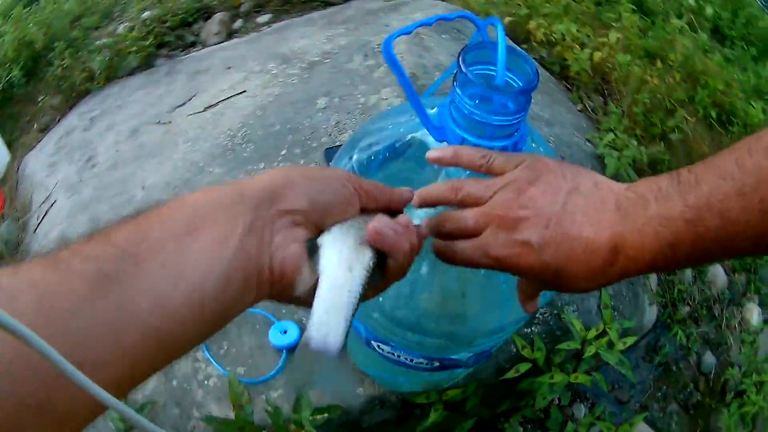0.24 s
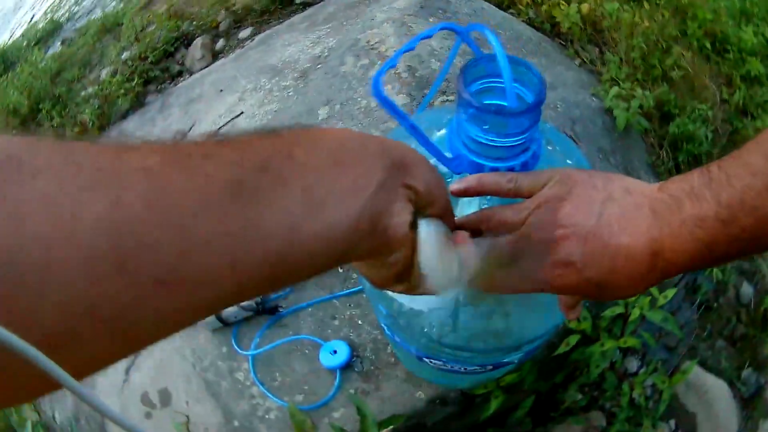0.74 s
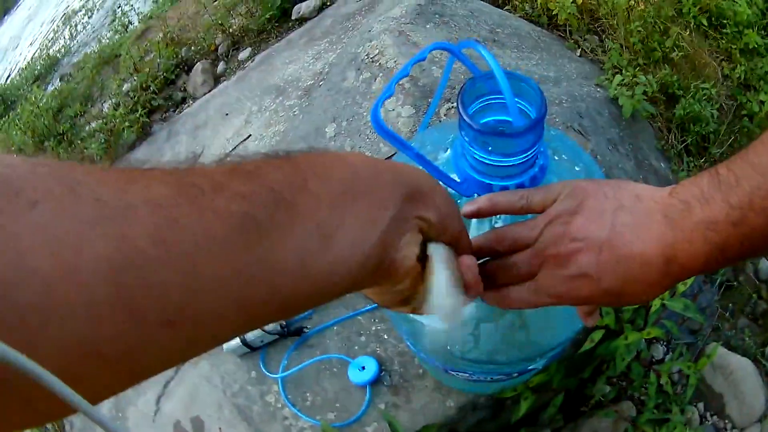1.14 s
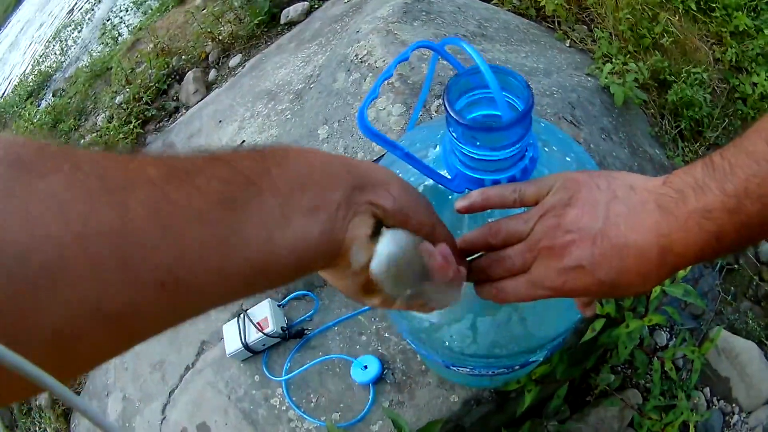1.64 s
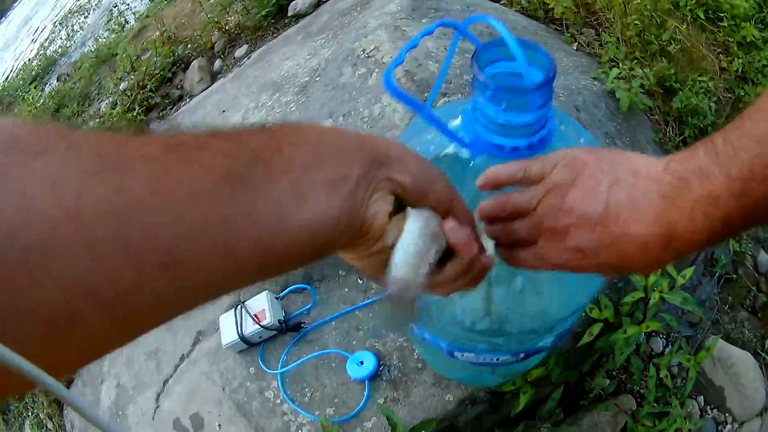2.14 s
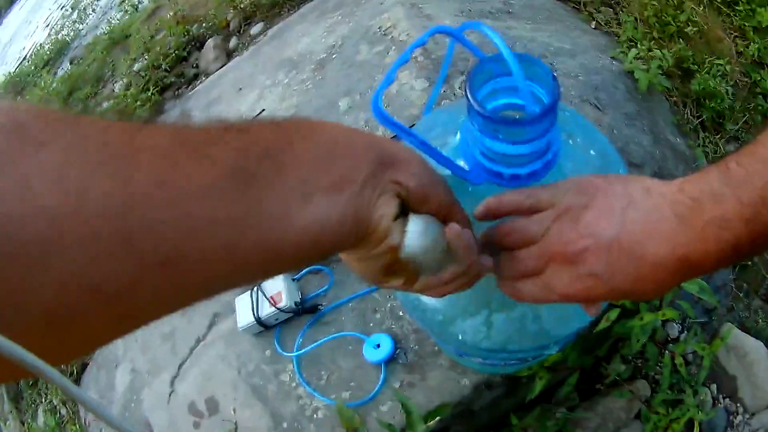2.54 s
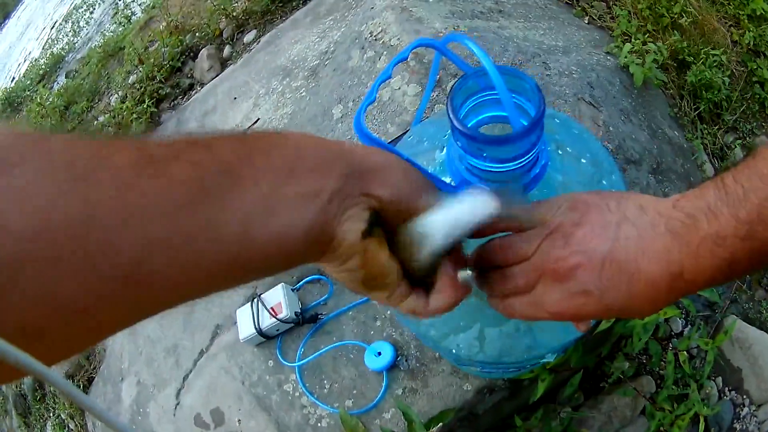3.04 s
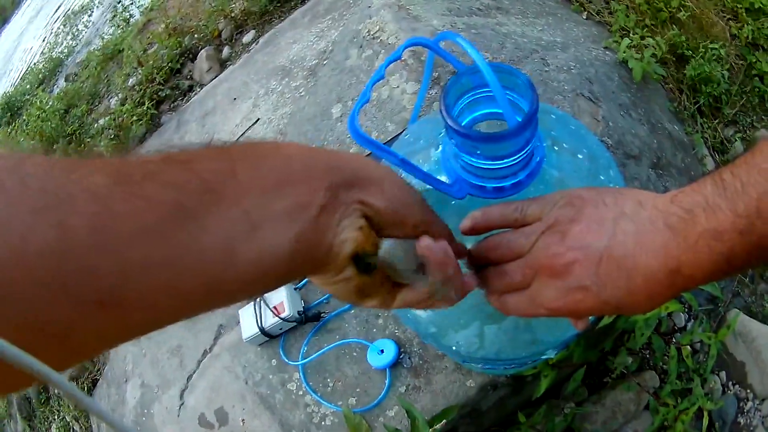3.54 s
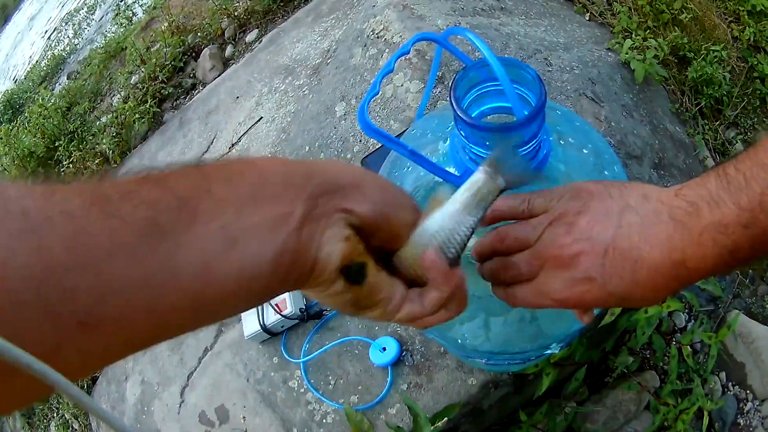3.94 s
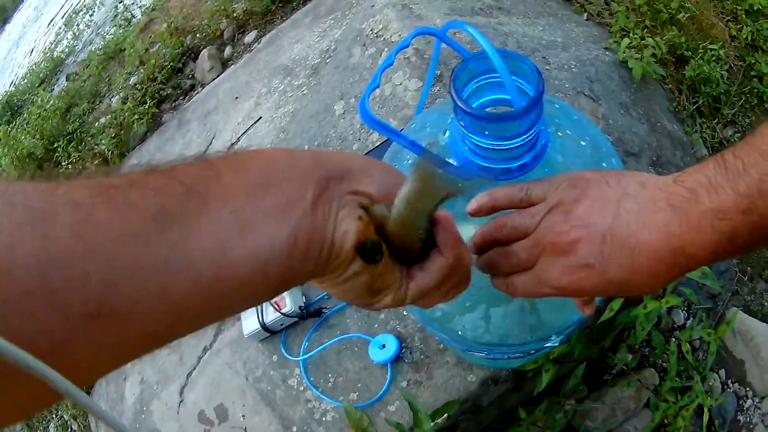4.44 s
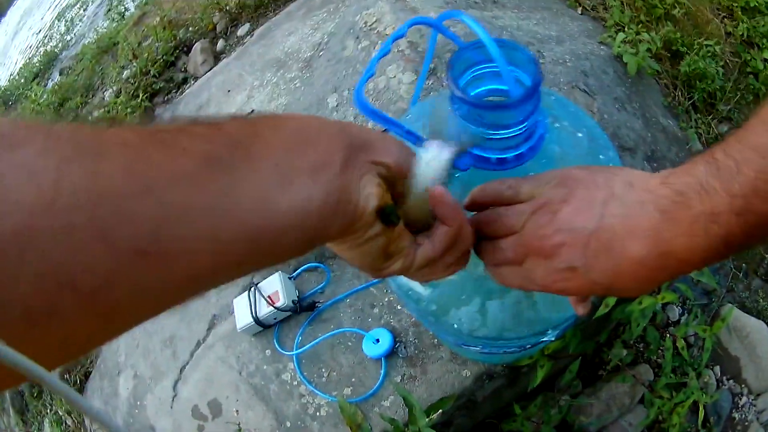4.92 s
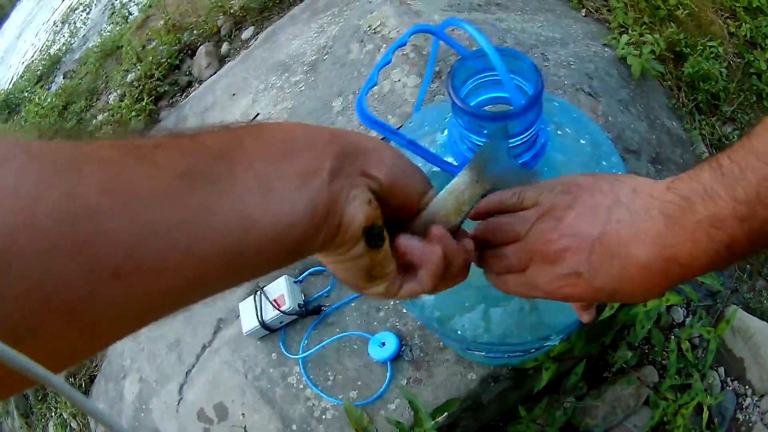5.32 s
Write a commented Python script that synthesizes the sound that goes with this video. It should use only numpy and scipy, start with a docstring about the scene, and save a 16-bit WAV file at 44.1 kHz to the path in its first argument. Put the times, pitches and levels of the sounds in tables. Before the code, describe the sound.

Outdoors by a river, one channel, close microphone. Right away hands scrape and knock a large plastic bottle, ending in one very loud snap with a short hollow boom. After that a small air pump drones in a steady rattling buzz over a dull, low rush of water. Light plastic taps come now and then, with a soft double bump before two seconds and another thud around four and a half.

```python
"""On a rock beside a river, a small battery air pump hums throughout and feeds a big plastic water bottle.
At once hands knock and scrape the bottle: its thin wall snaps, crackles, rings and booms in decaying modes.
Light taps and a few soft bumps close to the microphone follow now and then, each a set of short modes.
Valve strokes ring the pump case and shaped noise makes the river, all the way through.
A faint low drone, a tone and its octave, sinks away near 1 s, swells near 3 s, then climbs in pitch."""
import sys
import numpy as np
from scipy import signal
from scipy.fft import rfft, irfft
from scipy.io import wavfile
from scipy.ndimage import uniform_filter1d, minimum_filter1d

SR = 44100
rng = np.random.default_rng(int(sys.argv[2]) if len(sys.argv) > 2 else 0)


def dump(signal):
    """Clip the signal to [-1, 1] and save it as 16-bit WAV at the path in sys.argv[1]."""
    limited = np.clip(np.atleast_2d(signal).T, -1, 1)
    pcm = np.round(limited * 32767).astype(np.int16)
    wavfile.write(sys.argv[1], SR, pcm)


N = 246078
TIME = np.arange(N) / SR


def gain_of(db):
    """Decibels to an amplitude factor."""
    return 10 ** (np.asarray(db) / 20)


def evened(x):
    """Scales to an rms of one."""
    return x / np.sqrt(np.mean(x ** 2) + 1e-20)


def read(points, hz):
    """Reads a spectrum along a logarithmic frequency axis."""
    f, value = np.transpose(points)
    return np.interp(np.log(hz + 1), np.log(f), value)


def curve(points):
    """Joins (seconds, value) points by straight lines over the whole scene."""
    s, value = np.transpose(points)
    return np.interp(TIME, s, value)


def add(mix, s, sound):
    """Mixes a sound in at a time in seconds."""
    part = mix[max(round(s * SR), 0):][:len(sound)]
    part += sound[:len(part)]


def noise(spectrum, size):
    """Noise with a given spectrum and an rms of one."""
    white = rfft(rng.standard_normal(size))
    shape = gain_of(read(spectrum, np.fft.rfftfreq(size, 1 / SR)))
    return evened(irfft(white * shape, size))


def decay(t, t60):
    """An exponential fade that falls by 60 dB in t60 seconds."""
    return np.exp(-np.log(1000) * t / t60)


def ring(t, hz, t60):
    """One dying mode of a struck body."""
    return np.sin(2 * np.pi * hz * t) * decay(t, t60)


def low_cut(x, hz):
    """Takes away the deep bass that a small body cannot radiate."""
    return signal.sosfilt(signal.butter(4, hz, "high", fs=SR, output="sos"), x)


# Spectrum of the water beside the rock. Each row: frequency in Hz, relative level in dB per Hz.
RIVER_SPECTRUM = [(15, -22.5), (30, -15), (42, -15.5), (70, -2), (110, -1.5), (230, -1.5), (310, 0.5),
                  (520, -3), (620, -8.5), (1050, -9.5), (1400, -18), (2100, -27.5), (2300, -33.5),
                  (2900, -35), (3500, -40), (6200, -46), (7200, -53), (7800, -59.5), (15500, -63)]
RIVER_DB = -39  # rms level of the whole river


def river(patchy_db=1.0, swell_db=.5):
    """A steady, dull rush of churning water, with short patches of gurgle; its hiss swells a little."""
    hz, _, z = signal.stft(rng.standard_normal(N), SR, nperseg=1024, noverlap=768)
    patches = uniform_filter1d(rng.standard_normal(z.shape), size=6, axis=0)
    patches = evened(uniform_filter1d(patches, size=8, axis=1))
    swell = evened(uniform_filter1d(rng.standard_normal(z.shape[1]), size=50))
    swell = swell * np.minimum(hz / 1500, 1)[:, None]  # weaker in the bass
    z = z * gain_of(read(RIVER_SPECTRUM, hz)[:, None] + patchy_db * patches + swell_db * swell)
    _, water = signal.istft(z, nperseg=1024, noverlap=768)
    return gain_of(RIVER_DB) * evened(water[:N])


# The low drone behind it all. Each row: time in seconds, level of its lower tone in dB.
DRONE_LEVEL = [(0, -50), (.7, -55), (1, -76), (2, -71), (2.3, -55), (3.05, -45.5), (3.65, -51),
               (3.9, -49.5), (4.2, -56), (4.65, -52), (5.58, -57.5)]
# it holds its pitch, then climbs at a steady rate
DRONE_HZ, CLIMB_FROM_S, CLIMB_HZ_PER_S = 51.7, 3.1, 6.9


def drone(waver=0.18, octave_db=-4):
    """A faint low tone and its octave waver in level, hold their pitch and then climb slowly."""
    hz = DRONE_HZ + CLIMB_HZ_PER_S * np.maximum(TIME - CLIMB_FROM_S, 0)
    angle = 2 * np.pi * np.cumsum(hz) / SR
    flutter = 1 + waver * evened(uniform_filter1d(rng.standard_normal((2, N)), size=5000))
    tone = flutter[0] * np.sin(angle)
    octave = gain_of(octave_db) * flutter[1] * np.sin(2 * angle)
    return gain_of(curve(DRONE_LEVEL)) * np.sqrt(2) * (tone + octave)


# Speed of the pump on its rock. Each row: time in seconds, mean speed in turns a second.
PUMP_SPEED = [(0.2, 42.58), (0.5, 42.66), (0.67, 42.29), (1.0, 42.35), (1.27, 42.59), (1.43, 42.22),
              (1.88, 42.61), (2.04, 42.32), (2.29, 42.53), (2.45, 42.42), (2.88, 42.77), (3.04, 42.39),
              (3.58, 42.74), (3.72, 42.68), (4.01, 42.92), (4.16, 42.47), (4.7, 42.51), (5.0, 42.81),
              (5.26, 42.85), (5.46, 42.44)]
# Modes of the pump case. Each row: frequency in Hz, t60 in seconds, relative level in dB at the
# intake stroke, relative level in dB at the exhaust stroke.
CASE_MODES = [(283.5, 0.18, -33, -20), (407, 0.12, -27, -30.5), (827, 0.019, -22.5, -22.5),
              (949.5, 0.021, 3, -9), (1075.3, 0.032, -0.5, 3.5), (1241, 0.072, -11.5, -14),
              (1367.5, 0.131, -17, -26), (1552, 0.043, -15, -29), (1727, 0.023, -20, -17),
              (2150, 0.0065, -30, -39.5), (2620, 0.014, -20.5, -37.5), (3500, 0.015, -24.5, -39.5),
              (4500, 0.019, -31.5, -38), (5860, 0.0059, -31.5, -36)]
PUMP_DB = -36  # gain on all the case modes
EXHAUST_TURN = .684  # part of a turn from intake to exhaust
SPEED_WAVER = 0.022  # the motor never runs quite evenly (turns a second, rms)


def pump(uneven_db=-0.3, jitter_s=.00001, mode_scatter=0.18, close_s=0.00045):
    """Two valve strokes a turn ring the case; no two strokes are quite alike."""
    waver = SPEED_WAVER * evened(uniform_filter1d(rng.standard_normal(N), size=4000))
    turns = np.cumsum(curve(PUMP_SPEED) + waver) / SR
    t, out = TIME[:SR // 16], np.zeros(N)
    soft = 1 - np.exp(-t / close_s)  # the rubber flaps close softly
    for stroke, offset in enumerate([0, EXHAUST_TURN]):
        at = np.flatnonzero(np.diff(np.floor(turns - offset)))
        strength_db = uneven_db * rng.standard_normal(len(at))
        jitter = np.round(jitter_s * SR * rng.standard_normal(len(at))).astype(int)
        at = np.clip(at + jitter, 0, N - 1)
        for k, (hz, t60, *stroke_db) in enumerate(CASE_MODES):
            scatter = 1 + mode_scatter * rng.standard_normal(len(at))
            clicks = np.zeros(N)
            clicks[at] = gain_of(stroke_db[stroke] + strength_db) * scatter
            out += (-1) ** k * signal.oaconvolve(clicks, soft * ring(t, hz, t60))[:N]
    return gain_of(PUMP_DB) * out


# Modes of the body that is bumped close by. Each row: frequency in Hz, relative level in dB, t60 in seconds.
BUMP_MODES = [(142.7, -19.5, 0.14), (255, -9.5, 0.0147), (343, -8.5, 0.044), (495, -6, 0.01784),
              (667, -25, 0.095), (934, -18.5, 0.02), (1380, -6.5, 0.01)]


def bump(db, contact_ms):
    """A soft push into a well damped body: the longer the contact, the duller the thud."""
    t = TIME[:SR // 4]
    push = np.sin(np.pi * np.minimum(t * 1000 / contact_ms, 1)) ** 2
    body = sum(gain_of(mode_db) * ring(t, hz, t60) for hz, mode_db, t60 in BUMP_MODES)
    thud = signal.fftconvolve(body, push / push.sum())[:len(t)]
    return gain_of(db) * low_cut(thud, hz=182.0)


# band of the rasp: centre in Hz, octaves from there to a gain of 1/e; mean count of slips a second
SCRAPE_HZ, SCRAPE_OCTAVES, SLIPS_PER_S = 4620, 0.33, 5000


def scrape(length, db):
    """A finger sticks and slips on the plastic: a short, bright rasp of tiny clicks."""
    t = TIME[:round(length * SR)]
    slips = rng.standard_normal(len(t)) * (rng.random(len(t)) < SLIPS_PER_S / SR)
    octaves = np.log2(np.maximum(np.fft.rfftfreq(len(t), 1 / SR), 1) / SCRAPE_HZ)
    rasp = irfft(rfft(slips) * np.exp(-(octaves / SCRAPE_OCTAVES) ** 2), len(t))
    return gain_of(db) * np.sin(np.pi * t / length) * evened(rasp)


# Modes of a small patch of the bottle wall. Each row: frequency in Hz, relative level in dB, full t60 in seconds.
WALL_MODES = [(506, 0.5, 0.033), (1010, 4.5, .02), (1637, -4, 0.02), (1860, -9.5, 0.036),
              (2170, -6.5, 0.019), (2880, -10.5, 0.013), (3218, -23.5, 0.029), (3560, -27, 0.03),
              (3820, -26.5, 0.02), (4173, -22, 0.032), (4920, -22, 0.011), (5830, -19, 0.012),
              (6540, -29.5, .009)]
# Crackle of the bottle wall, for taps and knocks. Each row: frequency in Hz, relative level in dB per Hz.
CRACKLE_SPECTRUM = [(100, -34), (400, -8.5), (900, -4), (1750, -5.5), (2400, -19), (3500, -21),
                    (4500, -18.5), (6000, -24.5), (7200, -30.5), (8100, -52), (9400, -33), (10300, -54),
                    (11300, -36), (13000, -48), (16000, -60)]
SPOT_T60 = 0.036  # full ring time of the touched spot (s)
CLICK_TILT_DB = 1  # the click is brighter than the crackle (dB an octave)


def tap(db, tilt_db, spot_hz, spot_db, ring_share, top_hz, contact_s=.0001, click_db=-10, click_t60=0.036):
    """A sharp click rings a patch of wall and the touched spot's own note; the grip decides how long."""
    t = TIME[:SR // 8]
    patch = gain_of(spot_db) * ring(t, spot_hz, SPOT_T60 * ring_share)
    for k, (hz, mode_db, t60) in enumerate(WALL_MODES):
        level = gain_of(mode_db + tilt_db * np.log2(hz / 2000))
        patch = patch + (-1) ** k * level * ring(t, hz, t60 * ring_share)
    bright = [(hz, level + CLICK_TILT_DB * np.log2(hz / 2000)) for hz, level in CRACKLE_SPECTRUM]
    click = gain_of(click_db) * noise(bright, len(t)) * decay(t, click_t60)
    onset = 1 - np.exp(-(t / contact_s) ** 2)
    soft = signal.butter(3, top_hz, fs=SR, output="sos")
    return gain_of(db) * signal.sosfilt(soft, onset * (patch + click))


# the boom starts sharp by this share, while the dent holds the wall taut (relaxing by 1/e in RELAX_S)
BOOM_HZ, BOOM_DB, TAUT_SHARE, RELAX_S = 170.3, -16.5, 0.205, .056
# it rings almost freely, until the hand closes on the wall: a drop of GRIP_DB, then a steeper fall
FREE_DB_PER_S, GRIP_AFTER_S, GRIP_S, GRIP_DB, HELD_EXTRA_DB_PER_S = 38, 0.0675, 0.0074, 8, 135


def boom(t):
    """The whole wall pumps in and out: its pitch sags as the dent relaxes, until the hand damps it."""
    hz = BOOM_HZ * (1 + TAUT_SHARE * np.exp(-t / RELAX_S))
    held = np.maximum(t - GRIP_AFTER_S, 0)
    fall_db = FREE_DB_PER_S * t + GRIP_DB * np.minimum(held / GRIP_S, 1) + HELD_EXTRA_DB_PER_S * held
    return gain_of(BOOM_DB - fall_db) * np.sin(2 * np.pi * np.cumsum(hz) / SR)


# Modes of the whole bottle. Each row: frequency in Hz, relative level in dB, t60 in seconds.
BOTTLE_MODES = [(171.7, -5.4, 0.11), (198, -4.5, 0.04), (227, -14, .023), (274, -12, .048),
                (396, -2.5, 0.036), (479, -8.9, .079), (501, -7.5, 0.06), (689, -12, 0.028),
                (840, -24, 0.094), (932, -15.2, 0.03), (1149, -7.5, 0.043), (1222, -17, .049),
                (1467, -9.5, 0.018), (1636, -13, 0.043), (1720, -11, 0.043), (1860, -16.5, 0.084),
                (2130, -19.5, 0.04), (2690, -24, .028), (3200, -23, 0.023), (3670, -49, .02),
                (4370, -34, 0.078), (4500, -40, .055), (4851, -41, .06), (5440, -35, .03),
                (6130, -35, .028)]
CRACKLE_DB, PANEL_DB = -15.5, -18.5  # crackle and panel note within a knock


def knock(db, bass_db, treble_db, panel_hz, snap_t60=0.041, tail_db=-28, tail_t60=0.28, panel_t60=0.029):
    """The wall snaps and rings; a deep push wakes the low modes, a fingernail the high ones."""
    t = TIME[:SR // 2]
    touch = [(450, bass_db), (1100, 0.011), (2000, 0.011), (4500, treble_db)]  # (Hz, dB)
    modes = gain_of(PANEL_DB) * ring(t, panel_hz, panel_t60) - gain_of(bass_db) * boom(t)
    for k, (hz, mode_db, t60) in enumerate(BOTTLE_MODES):
        modes = modes + (-1) ** k * gain_of(mode_db + read(touch, hz)) * ring(t, hz, t60)
    # the crackle dies fast, and lingers faintly in the hollow of the bottle
    fade = decay(t, snap_t60) + gain_of(tail_db) * decay(t, tail_t60)
    tint = gain_of(read(touch, np.fft.rfftfreq(len(t), 1 / SR)))
    crackle = irfft(rfft(noise(CRACKLE_SPECTRUM, len(t))) * tint, len(t)) * fade
    onset = 1 - np.exp(-(t / 0.00012) ** 2)
    return gain_of(db) * low_cut(onset * (modes + gain_of(CRACKLE_DB) * crackle), hz=110)


# Knocks on the bottle. Each row: start in seconds, strength in dB, extra bass in dB, extra treble in dB,
# pitch of the touched panel in Hz.
KNOCK_EVENTS = [(.008, -24, 5.5, 9.5, 1960), (0.032, -27, 5.5, 9, 1726), (0.0414, -29, 6, -1, 2100),
                (0.0671, -21, 2, 7, 820), (0.0709, -28, 2, 0, 1200), (0.0985, -20.5, 2.5, 0, 1222),
                (0.1027, -26, -2, 3, 1476), (.110, -11.5, 3, 10.5, 1070), (0.1118, -14.5, -11, 1, 1520),
                (0.1145, -19, -3, -6, 2048), (0.1211, -29, -12, 4, 1022), (0.1324, 2, -3, -3, 1350),
                (0.138, -14, -15, -5, 1660)]
# Light taps on the wall. Each row: start in seconds, strength in dB, tilt in dB an octave, pitch of the
# touched spot in Hz, its relative level in dB, factor on the full ring times, top of the band in Hz.
TAP_EVENTS = [(.1352, -18.5, 1.5, 3190, -3, .55, 12000), (.154, -39, 1, 5600, -11, .9, 7500),
              (.704, -40, 2, 4870, -15, 0.48, 9000), (.751, -28, 3, 1760, -4, 1.27, 12000),
              (0.758, -49, 7, 4700, -3, 1.35, 7000), (0.7688, -39, 6, 6100, -18, 0.71, 12000),
              (1.377, -37.5, -5.5, 3200, -21, 0.75, 6000), (1.384, -39, 4.5, 3640, -10, 1.5, 6500),
              (1.3905, -37.5, -4, 2120, -4, 0.98, 4000), (1.3925, -48, 6, 3590, 0.5, 1.2, 6000),
              (1.3955, -48, 5, 4300, -5, 0.82, 5500), (1.764, -37.5, -4.5, 1790, 1, 0.65, 5500),
              (1.989, -35, -2, 2890, -4, 0.45, 4000), (1.9918, -45, -3, 3840, 0, 0.36, 4600),
              (2.2195, -31.5, -3, 3220, -15, .85, 5440), (2.2225, -41.5, 5, 2060, -3.5, 1.3, 4500),
              (2.2265, -44, 2, 3900, -6, .8, 5000), (3.387, -45, 3, 5950, -20, 1, 7000),
              (4.0455, -44.5, 4, 4300, -16, .8, 5000), (5.01, -42.5, -5, 1810, 3, 0.64, 5000),
              (5.074, -53, 6, 6040, -7, .6, 7500), (5.265, -39.5, 6.5, 3200, -10.5, 0.37, 7000)]
# Fingers scraping along the wall. Each row: start in seconds, length in seconds, level in dB before the fades.
SCRAPE_EVENTS = [(0.01, 0.0137, -61), (0.04, 0.026, -67), (0.088, 0.0087, -47), (0.096, 0.015, -41),
                 (0.111, 0.028, -41.5)]
# Soft bumps close by. Each row: start in seconds, strength in dB, contact time in milliseconds.
BUMP_EVENTS = [(0.569, -9, 3.7), (1.765, -2, 5.9), (1.776, 5, 8.4), (4.486, 2, 1.22)]


def handling():
    """Hands excite the bottle wall by knocks, light taps and scrapes; soft bumps land close by."""
    out = np.zeros(N)
    for play, events in [(bump, BUMP_EVENTS), (scrape, SCRAPE_EVENTS), (tap, TAP_EVENTS), (knock, KNOCK_EVENTS)]:
        for s, *touch in events:
            add(out, s, play(*touch))
    return out


def scene():
    """River, drone, pump and handling, in the open air and on one channel."""
    return (river() + drone() + pump() + handling())[None]


EDGE_HZ = 15800  # upper band limit


def record(dry):
    """A fast limiter holds the hardest knock at full scale; then the band limit."""
    room = minimum_filter1d(1 / np.maximum(abs(dry[0]), 1), size=129)
    held = dry * uniform_filter1d(uniform_filter1d(room, size=65), size=65)
    band = signal.firwin(511, EDGE_HZ, window=("kaiser", 9), fs=SR)
    return signal.oaconvolve(held, band[None], "same")


dry = scene()
out = record(dry)
dump(out)
```